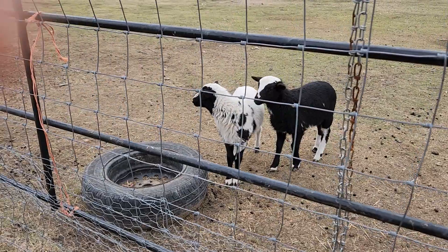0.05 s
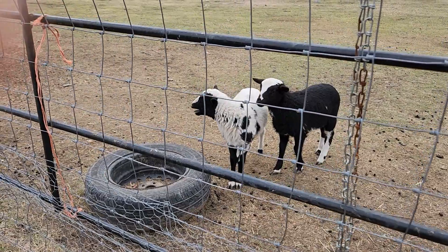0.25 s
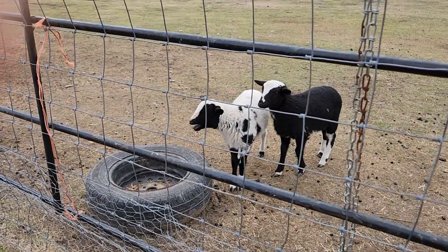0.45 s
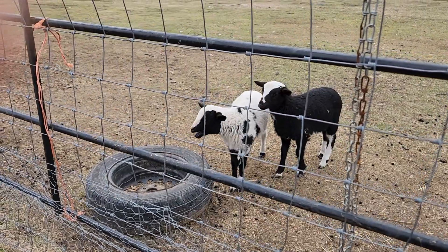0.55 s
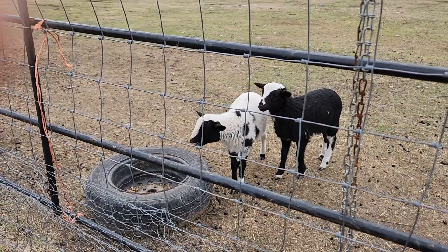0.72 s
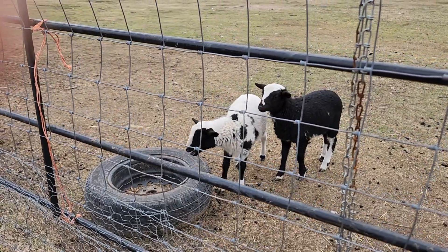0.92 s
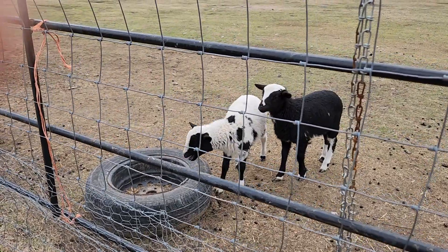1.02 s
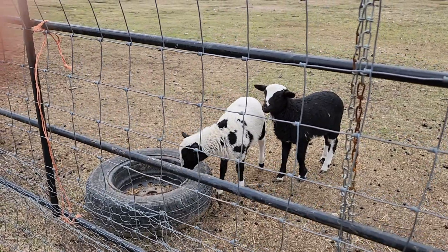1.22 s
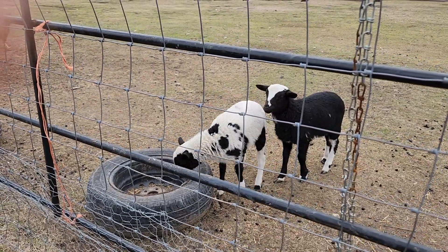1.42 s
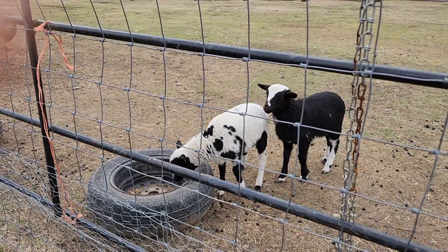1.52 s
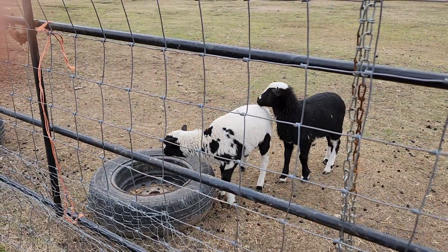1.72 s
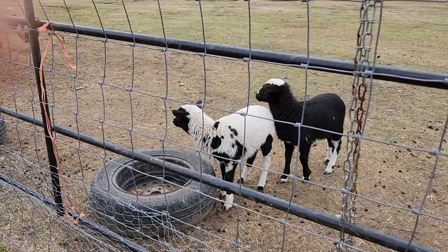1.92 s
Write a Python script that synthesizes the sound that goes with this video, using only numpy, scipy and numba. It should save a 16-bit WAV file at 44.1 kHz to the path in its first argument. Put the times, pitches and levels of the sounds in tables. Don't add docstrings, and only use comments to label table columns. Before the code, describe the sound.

A young lamb gives one long loud bleat outdoors, then an older sheep answers faintly further off

```python
import sys
import numpy as np
from scipy import signal
from scipy.fft import rfft, irfft
from scipy.io import wavfile
from scipy.ndimage import uniform_filter1d, map_coordinates
from numba import njit

SR = 44100
rng = np.random.default_rng(int(sys.argv[2]) if len(sys.argv) > 2 else 0)


def generate_wav(signal):
    frames = np.transpose(np.atleast_2d(signal))
    scaled = np.clip(frames, -1, 1) * 32767
    pcm = np.round(scaled).astype(np.int16)
    wavfile.write(sys.argv[1], SR, pcm)


def amplitude_ratio(level_db):
    exponent = np.asarray(level_db, float) / 20
    return 10 ** exponent


N = 85995
T = np.arange(N) / SR


def in_time(rows, outside=None):
    s, *columns = np.transpose(rows)
    return [np.interp(T, s, c, outside, outside) for c in columns]


def rms_one(x):
    return x / np.sqrt(np.mean(x ** 2) + 1e-20)


def drift(rate):
    r = np.exp(-2 * np.pi * rate / SR)
    noise = rng.standard_normal(N + SR)
    return rms_one(signal.lfilter([1], [1, -2 * r, r * r], noise)[SR:])


def later(x, ms):
    return map_coordinates(x, [np.arange(N) - ms * SR / 1000], order=3)


@njit
def ring(x, twice_cos, r):
    y = np.zeros(len(x))
    for i in range(2, len(x)):
        y[i] = (1 - r * r) / 2 * (x[i] - x[i - 2]) + r * twice_cos[i] * y[i - 1] - r * r * y[i - 2]
    return y


def resonance(x, hz, width_hz):
    twice_cos = 2 * np.cos(2 * np.pi * hz / SR) * np.ones(N)
    return ring(x + 1e-18, twice_cos, np.exp(-np.pi * width_hz / SR))


def pulses(rows, jitter, noise):
    rate, = in_time([row[:2] for row in rows])
    db, = in_time([row[::2] for row in rows], outside=-200)
    cycle = np.cumsum(rate * (1 + jitter * drift(60))) / SR % 1
    snaps = (np.diff(cycle, prepend=1) < 0) * np.sqrt(SR / rate)
    snaps = snaps * amplitude_ratio(10 * jitter * rng.standard_normal(N))
    puffs = rng.standard_normal(N) * 2 * np.exp(-3.0 * cycle)
    return amplitude_ratio(db) * (snaps + noise * puffs)


# t/s, f/Hz, level/dB
PITCH_ARCH = [
    (.24, 300.9, -37),
    (.292, 345.4, -28),
    (.305, 365.4, -22.5),
    (.335, 378.8, -21),
    (.398, 391.6, -21.5),
    (.502, 414, -17.5),
    (.608, 422.8, -20),
    (.8, 426.6, -18.5),
    (1.094, 422.1, -23),
    (1.256, 406.5, -24),
]
# t/s, change of f/Hz, change of level/dB
CLOSING_FALL = [
    (1.256, 1, -0.5),
    (1.326, -20.5, -6.5),
    (1.345, -43.5, -11.5),
    (1.365, -86, -14),
    (1.378, -110, -29.5),
    (1.39, -130, -64),
]
# t/s, alternate-cycle share [0-1], roughness [ratio], brightness level/dB
FOLD_STATE = [(.28, 0.37, 0.44, -13.5), (.3, 0.7, 0.11, -13), (.34, 0.43, 0.082, -9.5),
              (.362, 0, 0.016, -4.5), (.455, 0.03, 0.012, -1.5), (.472, 0.01, 0.065, -5),
              (.49, 0.01, 0.022, -1.5), (.56, 0.13, 0.036, 0), (.68, 0.1, 0.064, 2), (.78, 0.03, 0.041, -1),
              (.87, 0.04, 0.025, 1.5), (.92, 0.01, 0.015, 2.5), (1.14, 0.01, 0.011, 3.5),
              (1.17, 0.09, 0.045, 1), (1.21, 0.03, 0.018, -1), (1.325, 0.01, 0.022, -3),
              (1.35, 0.22, 0.24, -5.5)]


def lamb_folds():
    (hz, db), (fall_hz, fall_db) = in_time(PITCH_ARCH), in_time(CLOSING_FALL)
    alternate, rough, bright_db = in_time(FOLD_STATE)
    wander = 1 + 0.0024 * drift(17) + 0.039 * rough * drift(120)
    phase = 2 * np.pi * np.cumsum(uniform_filter1d(hz + fall_hz, size=800) * wander) / SR
    late = .3 * np.minimum(alternate, .2) * np.sin(phase / 2)
    smear = rng.uniform(-np.pi, np.pi, size=46) * np.clip(np.arange(46) / 14, 0, 1)
    grain_db = 2.5 * drift(90)
    grain_share = np.clip(rough / .05, .3, 1.5)
    tone = np.zeros(N)
    for k in range(1, 46):
        mottle_db = 3 * drift(10)
        flutter_db = mottle_db + grain_share * np.roll(grain_db, 1900 * k)
        upper_share = min(k / 16, 1) ** 2
        tone += amplitude_ratio(upper_share * flutter_db) * np.cos(k * (phase + late) + smear[k])
    tone = tone / np.sqrt(52 / 2)
    subharmonic = 1.15 * alternate * (1 + 0.043 * drift(8.9)) * np.cos(phase / 2)
    tone = tone * (1 + subharmonic + rough * drift(170))
    hiss = signal.lfilter([1.5, -1.0], [1], rng.standard_normal(N))
    breath = rough * hiss * (1 + .5 * np.cos(phase))
    gain = amplitude_ratio(db + fall_db) * np.clip((T - .225) / 0.013, 0, 1) * (T < 1.4)
    hum = amplitude_ratio(-26.5 - 30 * np.clip(T - .5, 0, 1)) * gain * np.sin(phase)
    return gain * (tone + breath), bright_db, hum


# t/s, pulse rate f/Hz, level/dB
CREAK = [(.208, 100, -48.5), (.22, 124, -39.5), (.23, 132, -38), (.25, 147, -37), (.28, 176, -35.5),
         (.3, 240, -25), (.33, 185, -50.5)]


def lamb_creak():
    return pulses(CREAK, jitter=0.06, noise=1)


# t/s, first f/Hz, second f/Hz, third f/Hz
MOUTH = [(.2, 1340, 2760, 3440), (.3, 1353, 2690, 3404), (0.34, 1360, 2890, 3340), (.48, 1390, 2853, 3564),
         (0.659, 1366, 2830, 3820), (0.821, 1470, 2790, 3503), (0.959, 1529, 2570, 3551),
         (1.151, 1340, 2850, 3570), (1.271, 1173, 2710, 3460), (1.334, 1230, 2700, 3430),
         (1.357, 1244, 3220, 3480), (1.379, 1120, 2860, 3300)]
# t/s, gain of first, second and third resonance level/dB
HEAD = [(.22, 4, -5, 8), (.29, -1, -8.5, 8), (.32, 4.5, -15.5, 8.5), (.355, -3.5, 0.5, 5.5),
        (.42, 2, -0.5, 6), (.5, 0.5, -5.5, 2), (.72, 0.5, 1, -3), (.96, 1.5, -2, -1), (1.1, 8, 1.5, 2.5),
        (1.25, -0.5, -5.5, -8), (1.312, 3.5, -12.5, 2.5), (1.341, 11, 0, 7), (1.369, 9, -12, -15)]
# width f/Hz, level/dB, left-right pan level/dB, left lead t/ms
MOUTH_PORTS = [
    (122, 9, 4, 0.18),
    (216, 8.5, 11, 0.31),
    (280, 0.5, 6, 0.25),
]
# t/s, f/Hz, level/dB
NOSE = [(.25, 2010, -12.5), (.45, 2050, -6.5), (.7, 2120, -19.5), (.95, 2123, -18.5), (1.15, 2260, -11),
        (1.28, 2280, 0.5), (1.36, 2140, -9)]
# f/Hz, width f/Hz, level/dB, left-right pan level/dB, left lead t/ms
FIXED = [(830, 160, -8, 3, .15), (4150, 350, -2, 2, .19), (5600, 500, -12, 0, .2), (6900, 900, -20, 2, .16),
         (8400, 600, -10, 4, .235), (10000, 800, -14, 5, .2), (11900, 900, -30, 2, .2),
         (14000, 1400, -24, -1, .2), (15500, 900, -24, -1, .17)]


def lamb_mouth(folds, bright_db):
    rows = []
    for hz, turn_db, (width_hz, db, *ports) in zip(in_time(MOUTH), in_time(HEAD), MOUTH_PORTS):
        rows.append((hz, width_hz, db + turn_db, *ports))
    nose_hz, nose_db = in_time(NOSE)
    rows.append((nose_hz, 460, nose_db, 3.5, 0.087))
    rows = sorted(rows + list(FIXED), key=lambda row: np.mean(row[0]))
    out = np.zeros((2, N))
    for k, (hz, width_hz, db, pan_db, lead_ms) in enumerate(rows):
        steep, beamed, treble, top = k > 0, k > 5, k > 6, k > 10
        opening_db = 3 + 7 * (T - 0.56)
        level_db = db + 12 + treble * bright_db + top * opening_db
        part = (-1) ** k * amplitude_ratio(level_db) * resonance(folds, hz, width_hz)
        if steep:
            part = 1.294 * resonance(part, hz, 2 * width_hz)
        left_db = pan_db / 2 + beamed * 1.5 * drift(1)
        right_db = -pan_db / 2 + beamed * 1.5 * drift(2.7)
        lag_ms = lead_ms + beamed * .02 * drift(8.4)
        out += [amplitude_ratio(left_db) * part, amplitude_ratio(right_db) * later(part, lag_ms)]
    return signal.sosfilt(signal.butter(4, 650, "high", fs=SR, output="sos"), out)


# t/s, delay t/ms
GROUND = [(.2, 2.96), (.6, 2.393), (1.0, 2.5), (1.4, 2.47)]


def ground_echo(voice):
    lag_ms, = in_time(GROUND)
    return amplitude_ratio(-15) * np.array([later(voice[0], lag_ms), later(voice[1], lag_ms + 0.082)])


def yard_echo(voice):
    t = T[:SR // 2]
    tail = rng.standard_normal((2, SR // 2)) * amplitude_ratio(-60 * t / 0.16) * (t > .008)
    wet = signal.fftconvolve(voice, amplitude_ratio(-36) * tail, axes=1)[:, :N]
    return signal.lfilter([.4], [1, -.6], wet)


def lamb():
    folds, bright_db, hum = lamb_folds()
    voice = lamb_mouth(folds + lamb_creak(), bright_db) + hum
    return voice + ground_echo(voice) + yard_echo(voice)


def far_call(rows, throat, noise, shuts_s):
    folds = pulses(rows, jitter=0.018, noise=noise)
    shut_db = -14 * np.clip((T - shuts_s) / 0.028, 0, 1)
    call = np.zeros(N)
    for k, (hz, width_hz, db) in enumerate(throat):
        shut_share = (k == 3 or k > 4) - 0.38 * (k == 4)
        part = resonance(resonance(folds, hz, width_hz), hz, 2 * width_hz)
        call += (-1) ** k * amplitude_ratio(db + 12.5 + shut_db * shut_share) * part
    return call


# t/s, pulse rate f/Hz, level/dB
EWE = [(1.05, 165, -72), (1.18, 160, -50), (1.33, 152, -29), (1.4, 154, -31), (1.58, 153, -28),
       (1.62, 143, -29), (1.66, 135, -31.5), (1.7, 146, -31), (1.74, 140, -37.5), (1.772, 109, -40.5),
       (1.785, 470, -54.5), (1.83, 120, -63.5)]
# t/s, half width t/s, level/dB
EWE_GAPS = [
    (1.438, 0.01, -5),
    (1.6, 0.01, -15.5),
    (1.672, 0.014, -17),
    (1.752, 0.00845, -10),
]
# f/Hz, width f/Hz, level/dB
EWE_THROAT = [(594, 172, -13), (1414, 310, -20), (2050, 247, -4.5), (2823, 213, -3), (3690, 360, -17.5),
              (4900, 510, -19.5), (6140, 320, -29), (8500, 1200, -50)]
# t/s, pulse rate f/Hz, level/dB
LAST_CALL = [
    (0, 135, -58),
    (.025, 130, -62),
    (.045, 125, -79),
]
# f/Hz, width f/Hz, level/dB
LAST_THROAT = [(1200, 990, -8), (2800, 940, 8), (4730, 520, 10), (5980, 260, 12.5)]


def ewe():
    gaps_db = sum(db * np.exp(-((T - s) / half) ** 2) for s, half, db in EWE_GAPS)
    call = amplitude_ratio(gaps_db) * far_call(EWE, EWE_THROAT, noise=.42, shuts_s=1.618)
    call = call + far_call(LAST_CALL, LAST_THROAT, noise=1.0, shuts_s=2)
    pan_db, lag_ms = 6, 0.14
    return np.array([amplitude_ratio(pan_db / 2) * call, amplitude_ratio(-pan_db / 2) * later(call, lag_ms)])


# t/s, length t/s, f/Hz, width f/Hz, level/dB
RUSTLES = [
    (0.078, 0.046, 3970, 890, -56.5),
    (0.222, 0.11, 1780, 1200, -46.5),
    (1.816, 0.027, 7500, 2000, -59.5),
    (1.841, 0.071, 12900, 4220, -61),
    (1.931, 0.046, 4280, 505, -63),
]


def rustles():
    out = np.zeros((2, N))
    for s, length, hz, width_hz, db in RUSTLES:
        swell = amplitude_ratio(db) * np.exp(-(2 * (T - s) / length) ** 4)
        for side, noise in enumerate(rng.standard_normal((2, N))):
            band = resonance(resonance(noise, hz, width_hz), hz, width_hz)
            out[side] += swell * rms_one(band)
    return out


# f/Hz, likeness [0-1]
LIKENESS = [(30, .96), (150, .98), (400, .8), (1500, .5), (8000, .2)]


def coloured(points, patchy_db):
    log_hz = np.log(np.maximum(np.fft.rfftfreq(N, 1 / SR), 1))
    at, db = np.transpose(points)
    like_at, like = np.transpose(LIKENESS)
    alike = np.clip(np.interp(log_hz, np.log(like_at), like), 0, 1)
    mid, side = rfft(rng.standard_normal((2, N))) * amplitude_ratio(np.interp(log_hz, np.log(at), db))
    pair = irfft(np.sqrt(1 + alike) * mid + np.sqrt(1 - alike) * side * [[1], [-1]], N)
    return rms_one(pair * amplitude_ratio(patchy_db * drift(3.6)))


# f/Hz, level/dB
RUMBLE = [(12, -49.5), (20, -18.5), (64, 0), (97, -5), (125, -3), (150, -10.5), (182, -16.5), (304, -27),
          (400, -40.5), (520, -70.5), (880, -120)]


def rumble():
    return amplitude_ratio(-34) * coloured(RUMBLE, patchy_db=0.5)


# f/Hz, level/dB
AIR = [(240, -31), (400, -3.5), (1440, -12), (2250, -21), (2550, -22.5), (7970, -24), (16000, -39)]
# t/s, level/dB
AIR_LEVEL = [(0, 6.5), (.2, 16), (1.4, 14), (1.6, 14), (1.75, 7), (1.83, 5.5), (1.93, 12), (1.95, -1)]


def air():
    air_db, = in_time(AIR_LEVEL)
    return amplitude_ratio(-66 + air_db) * coloured(AIR, patchy_db=4.0)


def scene():
    return lamb() + ewe() + rustles() + rumble() + air()


def band_limit(x):
    return signal.sosfilt(signal.butter(12, 16100, fs=SR, output="sos"), x)


def record(dry):
    top_cut = signal.cheby2(12, 60, 16100, fs=SR, output="sos")
    mix = signal.sosfilt(top_cut, np.clip(dry, -1, 1))
    return band_limit(mix)


dry = scene()
out = record(dry)
generate_wav(out)
```